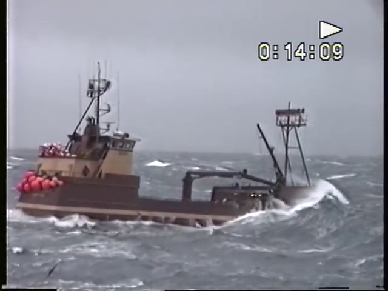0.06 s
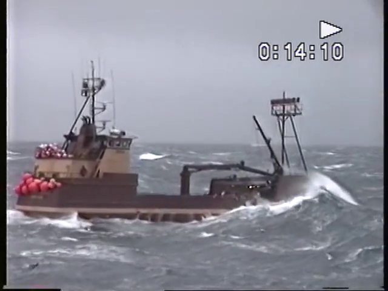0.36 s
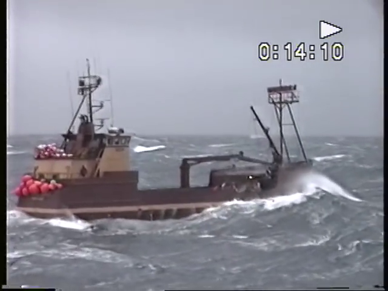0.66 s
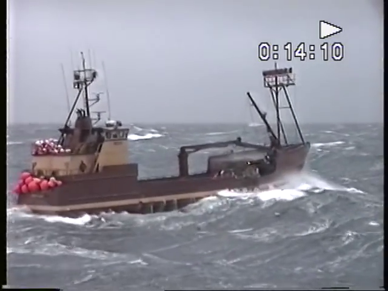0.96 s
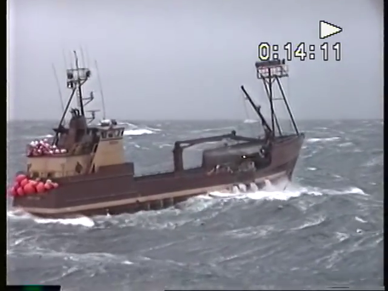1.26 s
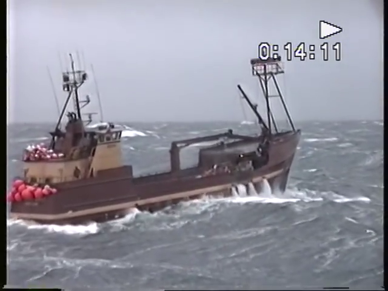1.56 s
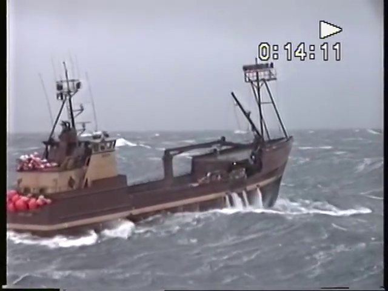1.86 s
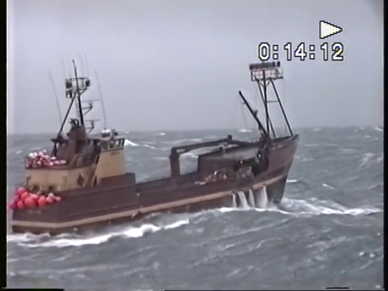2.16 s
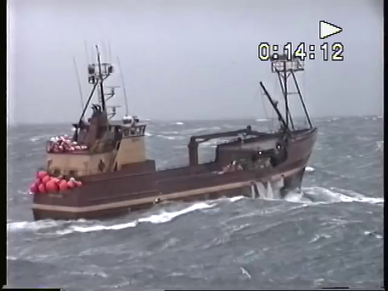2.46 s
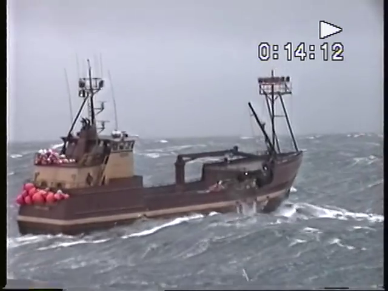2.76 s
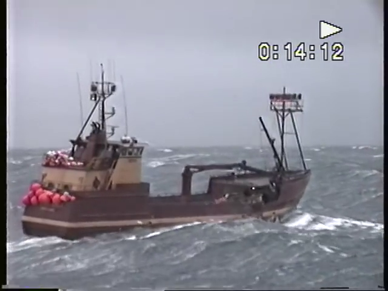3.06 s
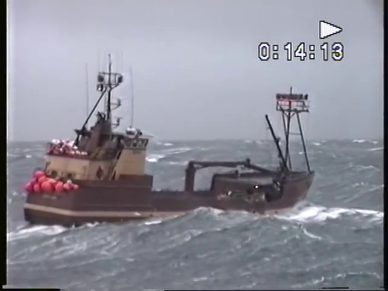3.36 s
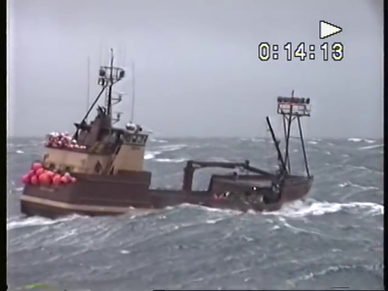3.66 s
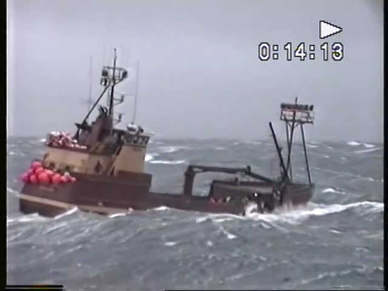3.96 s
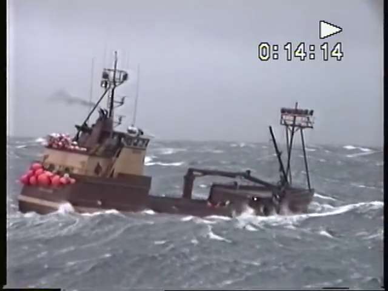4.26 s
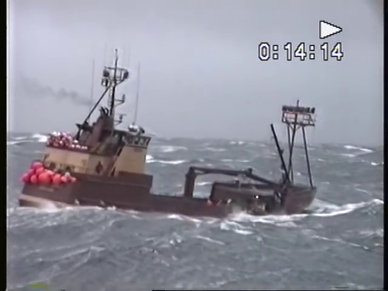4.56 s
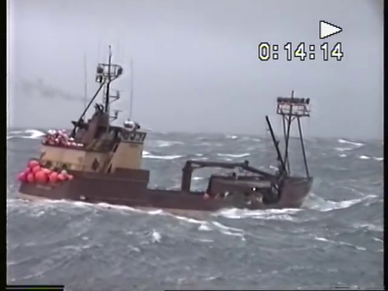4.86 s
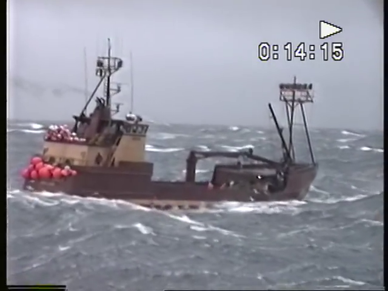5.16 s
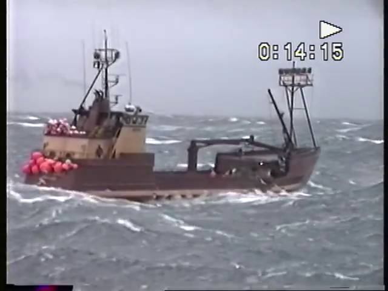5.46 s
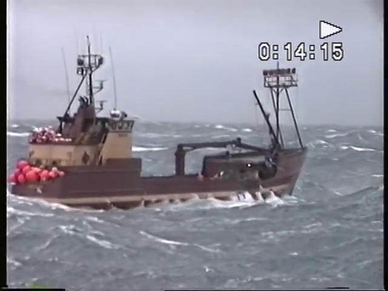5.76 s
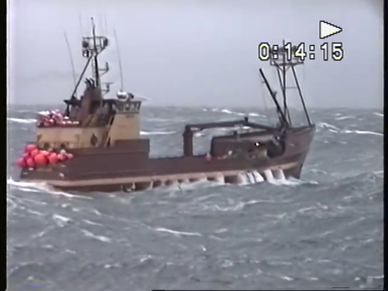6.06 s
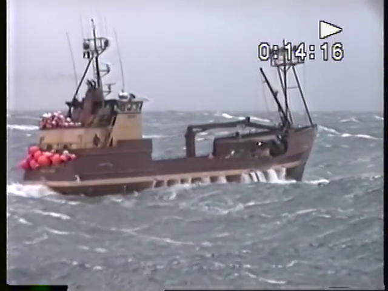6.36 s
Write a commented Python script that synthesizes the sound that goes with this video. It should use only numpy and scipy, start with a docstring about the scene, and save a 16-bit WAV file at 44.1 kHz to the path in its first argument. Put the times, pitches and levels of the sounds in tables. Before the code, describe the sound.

A fishing boat's diesel engines drone with a pulsing beat in rough sea, over wave wash, spray and wind rumbling on the microphone.

```python
"""A fishing boat rides a heavy sea, heard on a tape camcorder. From the start two six-cylinder diesels
beat three or four times a second over a near hull's hum, wind rumble, wave wash and spray; the tape's
noise reduction makes wash and hiss flutter with the drone. Just before 0.9 s the wind moans, the first of
six times. At 0.9 and 1.3 s the level dips with a thump. A soft, very high hiss swells and fades around
2 s, a third dip follows at 2.5 s, the wind picks up near 4 s, and the last dip comes at 5.7 s."""
import sys
import numpy as np
from scipy import signal
from scipy.fft import rfft, irfft, next_fast_len
from scipy.io import wavfile
from scipy.ndimage import uniform_filter1d, map_coordinates

SR = 44100
rng = np.random.default_rng(int(sys.argv[2]) if len(sys.argv) > 2 else 0)


def bounce(signal):
    """Save signal as a 16-bit WAV file at the path given by the first command-line argument."""
    frames = np.transpose(np.atleast_2d(signal))
    limited = np.clip(frames, -1, 1)
    pcm = np.round(limited * 32767).astype(np.int16)
    wavfile.write(sys.argv[1], SR, pcm)


N = 287091
CYLINDERS = 6

# Engine speed. Each row: time in seconds, firing rate of engine one in Hz, of engine two in Hz.
FIRING_RATES = [(0.0, 135.4, 138.65), (0.35, 137.57, 140.23), (0.7, 139.09, 142.09), (1.1, 140.52, 143.75),
                (1.5, 142.06, 145.57), (2.1, 142.04, 146.46), (2.9, 141.14, 145.37), (3.6, 139.86, 143.59),
                (3.9, 139.84, 142.96), (4.2, 139.36, 142.64), (4.5, 139.08, 142.56), (4.8, 138.9, 142.21),
                (5.3, 139.35, 142.23), (5.7, 140.12, 143.71), (6.1, 141.04, 144.91), (6.5, 141.54, 146.19)]
# Exhaust levels as the boat turns. Each row: time in seconds, firing line of engine one in dB,
# of engine two in dB, base of the lower side lines in dB, of the upper side lines in dB.
EXHAUST_LEVELS = [(0.0, -39.9, -44.6, -39.6, -47.7), (0.2, -33.6, -46.5, -37.7, -46.3),
                  (0.4, -39.1, -42.9, -37.8, -44.5), (0.5, -36.3, -46.9, -39.4, -42.4),
                  (0.8, -37.3, -45.0, -37.1, -39.1), (1.1, -36.9, -46.6, -45.9, -45.7),
                  (1.5, -37.9, -43.3, -42.4, -46.2), (1.8, -39.0, -39.8, -40.2, -45.6),
                  (2.3, -38.1, -38.1, -38.5, -42.8), (2.8, -36.8, -40.5, -43.6, -48.4),
                  (3.1, -36.3, -36.9, -38.2, -40.9), (3.6, -37.3, -36.9, -36.7, -36.6),
                  (3.9, -34.4, -41.6, -37.9, -36.8), (4.2, -37.1, -42.7, -41.4, -38.7),
                  (4.5, -33.7, -42.9, -40.3, -39.2), (4.9, -35.1, -43.4, -41.5, -38.1),
                  (5.4, -34.6, -41.9, -37.6, -37.9), (5.8, -33.8, -43.9, -42.7, -42.1),
                  (6.5, -38.3, -42.1, -46.9, -48.1)]
# Exhaust brightness. Each row: time in seconds, base level of overtones and rasp in dB.
BARK_LEVELS = [(0, -35.5), (.5, -38), (.9, -43), (1.5, -40.5), (2.3, -38.5), (3, -35), (3.8, -37),
               (4.5, -37), (5.4, -37.5), (6.5, -39.5)]
# Side lines and overtones. Each row: multiple of shaft speed, dB over base for engine one, for engine two.
SHAFT_ORDERS = [(3, -27, -21), (5, -15, -5), (7, -18, -12), (8, -22, -20), (9, -30, -24), (10, -34, -21),
                (11, -25, -37), (12, -17.3, -21.5), (14, -28.5, -35), (15, -34, -29), (18, -31, -30),
                (23, -28.5, -32)]
# Near hull's hum. Each row: time in seconds, level in dB.
HULL_LEVELS = [(0, -73), (1.6, -56), (3, -72), (4.1, -52), (6.5, -54)]
# Its tones. Each row: frequency in Hz, relative level in dB.
HULL_TONES = [(37.2, 0), (72.5, -9)]
# Wind on the microphone. Each row: time in seconds, rumble level in dB.
WIND_LEVELS = [(0, -43.5), (.5, -43.5), (.85, -43), (1.1, -39.5), (1.45, -47.5), (2.1, -50), (2.9, -49),
               (3.6, -49.5), (3.9, -45), (5.4, -44.5), (6.5, -41.5)]
# Breaking waves. Each row: peak time in seconds, length in seconds, wash in dB, spray in dB.
WAVES = [(0.097, 0.21, -58, -68), (0.235, 0.024, -49, -58), (0.282, 0.069, -50.5, -58.5),
         (0.97, 0.68, -50, -58.5), (1.24, 0.05, -54, -60), (2.275, 0.56, -50, -66.5),
         (2.308, 0.037, -51, -62), (2.41, 0.036, -57, -80), (2.87, 0.18, -60, -66.5),
         (3.02, 0.062, -54.5, -79), (3.148, 0.43, -51, -70), (3.573, 0.46, -50, -61.5),
         (3.775, 0.098, -46.5, -61), (4.428, 0.074, -49, -63), (5.014, 0.8, -54, -64.5),
         (5.78, 0.41, -50.5, -63.5)]
# Wind buffets. Each row: peak time in seconds, length in seconds, level in dB.
WIND_BUFFETS = [(0.092, 0.035, -48), (0.446, 0.033, -35.5), (0.973, 0.033, -32.5), (1.03, 0.091, -34),
                (1.25, 0.026, -34), (1.792, 0.027, -38), (2.5, 0.059, -38.5), (4.044, 0.021, -42),
                (5.06, 0.042, -41), (5.585, 0.041, -37)]
# Wind moans. Each row: peak time in seconds, length in seconds, pitch in Hz, level in dB.
WIND_MOANS = [(0.863, 0.27, 1094, -64), (2.2, .7, 790, -61.5), (3.05, 0.17, 934, -66),
              (3.6, 0.42, 880, -65.5), (4.8, 0.99, 1566, -67.5), (6.3, 0.35, 456, -57.5)]
# Sudden level dips. Each row: start in seconds, depth in dB, level of the leading thump in dB.
LEVEL_DIPS = [(0.905, 10, -43), (1.263, 15, -41), (2.473, 14, -37.5), (5.668, 19.5, -38.5)]
# Noise spectra. Each row: frequency in Hz, relative density in dB.
RASP_SPECTRUM = [(30, -100), (150, -26), (300, -1), (430, -3), (540, 5), (720, -3), (820, -0.5), (920, -3),
                 (1500, -11), (2500, -19), (9000, -100)]
RUMBLE_SPECTRUM = [(8, -30), (18, -1), (45, 0), (75, -2), (100, -4), (150, -9), (220, -16), (400, -40),
                   (2000, -120)]
WASH_SPECTRUM = [(20, -89), (80, -38), (150, 5), (280, 2), (400, -1.5), (550, -5), (700, -7), (950, -7),
                 (1500, -11.5), (2200, -21.5), (4000, -27.5), (12000, -100)]
SPRAY_SPECTRUM = [(200, -57), (600, -26), (1500, 3), (2500, 0), (3500, -0.5), (5000, 0.5), (7500, -4),
                  (10000, -11), (11500, -15.5), (13000, -23.5), (15500, -24)]
BUFFET_SPECTRUM = [(8, -26), (20, 2), (45, -5), (70, -7.5), (110, -13.5), (300, -32), (2000, -120)]
THUMP_SPECTRUM = [(20, -27), (60, -8), (250, -3.5), (450, -21.5), (1500, -40), (5000, -73)]
HIGH_HISS_SPECTRUM = [(3000, -35), (7000, -0.5), (10000, -2.5), (11500, -8), (13000, -17), (15500, -30)]

TIME_S = np.arange(N) / SR


def amp(db):
    """Decibels to gain."""
    return 10 ** (np.asarray(db) / 20)


def unit(x):
    """x at rms 1."""
    return x / np.sqrt(np.mean(x ** 2) + 1e-20)


def curves(rows):
    """One value per sample for each column after the time."""
    times_s, *columns = np.transpose(rows)
    return [np.interp(TIME_S, times_s, column) for column in columns]


def wobble(rate_hz):
    """Smooth random curve, rate_hz knots a second."""
    knots = rng.standard_normal(int(N * rate_hz / SR) + 4)
    coarse_s = TIME_S[::64]
    return np.interp(TIME_S, coarse_s, map_coordinates(knots, [coarse_s * rate_hz]))


def filtered(x, response):
    """x through a gain given as a function of Hz."""
    size = next_fast_len(N + SR // 2)
    return irfft(rfft(x, size) * response(np.fft.rfftfreq(size, 1 / SR)), size)[..., :N]


def coloured(x, spectrum):
    """x shaped by (Hz, dB) points on a log axis, at rms 1."""
    points_hz, db = np.transpose(spectrum)
    return unit(filtered(x, lambda hz: amp(np.interp(np.log(hz + 1), np.log(points_hz + 1), db))))


def rush(spectrum, patchy_db):
    """Coloured noise at rms 1, with random gain patches in time and frequency."""
    bins = signal.stft(rng.standard_normal(N), nperseg=512)[2]
    patches = uniform_filter1d(rng.standard_normal(bins.shape), size=6, axis=0)
    patches = unit(uniform_filter1d(patches, size=14, axis=1))
    noise = signal.istft(bins * amp(patchy_db * patches), nperseg=512)[1][:N]
    return coloured(noise, spectrum)


def hump(peak_s, length_s):
    """Bell curve of power, length_s wide at half height."""
    return np.exp2(-np.minimum((2 * (TIME_S - peak_s) / length_s) ** 2, 100))


def surges(events, bed_db=-np.inf):
    """Gain of (peak s, length s, dB) humps, added in power to an optional bed."""
    power = sum(amp(db) ** 2 * hump(peak_s, length_s) for peak_s, length_s, db in events)
    return np.sqrt(amp(bed_db) ** 2 + power)


def exhaust(turns, firing_db, lower_db, upper_db, bark_db, orders, orders_db):
    """Firing line and overtones, flanked by lines from cylinders that fire unequally."""
    def line(order, db):
        lag = rng.random() if order > CYLINDERS + 2 else 0  # the pipe scatters overtone phases
        return amp(db) * np.sqrt(2) * np.cos(2 * np.pi * (order * turns - lag))

    sides = np.zeros(N)
    for order, db in zip(orders, orders_db):
        base_db = lower_db if order < CYLINDERS else upper_db if order <= CYLINDERS + 2 else bark_db
        waver_db = 3.0 * min(abs(order / CYLINDERS - 1), 1) * wobble(7)
        sides += line(order, base_db + db + waver_db)
    return line(CYLINDERS, firing_db + 1.03 * wobble(18)) + sides  # combustion varies turn to turn


def rasp(turns, jitter_s, gas_ratio):
    """One puff per firing, each cylinder with its own size and timing; hot gas hisses after it."""
    fired = np.flatnonzero(np.diff(np.floor(turns * CYLINDERS)))
    cylinder = np.arange(len(fired)) % CYLINDERS
    size, lateness = rng.standard_normal((2, CYLINDERS))
    onsets = np.clip(fired + (jitter_s * SR * lateness[cylinder]).astype(int), 0, N - 1)
    puff_db = 6.0 * size[cylinder] + 3.0 * rng.standard_normal(len(onsets))
    puffs = np.bincount(onsets, amp(puff_db), N)
    gas = rng.standard_normal(N) * np.exp(-3 * (turns * CYLINDERS % 1))
    return coloured(unit(puffs) + gas_ratio * unit(gas), RASP_SPECTRUM)


def diesels():
    """Two engines speed up and sag as the swell loads the propellers, drifting in and out of step."""
    one_hz, two_hz = curves(FIRING_RATES)
    one_db, two_db, lower_db, upper_db = curves(EXHAUST_LEVELS)
    bark_db, = curves(BARK_LEVELS)
    orders, one_orders_db, two_orders_db = np.transpose(SHAFT_ORDERS)
    one_turns = np.cumsum(one_hz) / SR / CYLINDERS + 0.655
    two_turns = np.cumsum(two_hz) / SR / CYLINDERS + 0.107
    drone = exhaust(one_turns, one_db, lower_db, upper_db, bark_db, orders, one_orders_db)
    drone += exhaust(two_turns, two_db, lower_db, upper_db, bark_db, orders, two_orders_db)
    puffs = rasp(one_turns, jitter_s=0.000561, gas_ratio=1.7)
    puffs += rasp(two_turns, jitter_s=0.000474, gas_ratio=0.97)
    return drone + amp(bark_db - 23.5) * puffs


def hull_hum():
    """The near hull hums at its own rate, wavering a little."""
    hum_db, = curves(HULL_LEVELS)
    wavering_s = TIME_S + 0.002 * wobble(3.4)
    return sum(amp(hum_db + db + 1.5 * wobble(5.5)) * np.sqrt(2) * np.sin(2 * np.pi * hz * wavering_s)
               for hz, db in HULL_TONES)


def wind_rumble():
    """Gusty wind on the microphone."""
    rumble_db, = curves(WIND_LEVELS)
    return amp(rumble_db + 0.91 * wobble(14)) * rush(RUMBLE_SPECTRUM, patchy_db=-0.3)


def waves(wash_bed_db, spray_bed_db, fade_db_per_s):
    """Crests break and throw flickering spray over an open sea whose hiss slowly thins."""
    peak_s, length_s, wash_db, spray_db = np.transpose(WAVES)
    wash_gain = surges(zip(peak_s, length_s, wash_db), wash_bed_db)
    spray_gain = surges(zip(peak_s, length_s, spray_db), spray_bed_db - fade_db_per_s * TIME_S)
    wash = wash_gain * rush(WASH_SPECTRUM, patchy_db=0.6)
    spray = spray_gain * rush(SPRAY_SPECTRUM, patchy_db=0.5)
    return wash + spray * amp(0.68 * wobble(19))


def noise_reduction(x, depth, follow_s, settle_s, bass_share):
    """The tape's compander mistracks: gain follows the fast envelope over the slow, deepening throbs."""
    fast = uniform_filter1d(abs(signal.hilbert(x[0])), size=int(follow_s * SR)) + 1e-6
    pole = np.exp(-1 / (settle_s * SR))
    slow = signal.lfilter([1 - pole], [1, -pole], fast, zi=[pole * fast.mean()])[0]
    gain = (fast / slow) ** depth
    treble = filtered(x, lambda hz: hz ** 2 / (hz ** 2 + 400 ** 2))
    return x + (treble + bass_share * (x - treble)) * (gain - 1)


def line_whistle(line_hz, field_hz):
    """A faint high whistle, pulsing at field rate with a slight random flutter, louder on the left."""
    flutter = 1 + 0.4 * np.cos(2 * np.pi * field_hz * TIME_S) + 0.25 * wobble(24)
    return amp([[-82.5], [-89.5]]) * flutter * np.sin(2 * np.pi * line_hz * TIME_S)


def buffets():
    """Single gusts hit the microphone."""
    return surges(WIND_BUFFETS) * coloured(rng.standard_normal(N), BUFFET_SPECTRUM)


def moans(width_hz):
    """Wind moans: narrow noise bands swell and fade with the gusts."""
    sound = np.zeros(N)
    for peak_s, length_s, pitch_hz, db in WIND_MOANS:
        band = filtered(rng.standard_normal(N), lambda hz: 1 / (1 + (2 * (hz - pitch_hz) / width_hz) ** 2))
        sound += amp(db) * np.sqrt(hump(peak_s, length_s)) * unit(band)
    return sound


def thumps(lead_s, length_s):
    """A low thump leads each dip."""
    gain = surges((start_s - lead_s, length_s, db) for start_s, _, db in LEVEL_DIPS)
    return gain * coloured(rng.standard_normal(N), THUMP_SPECTRUM)


def dips(x, fall_s, quick_s, slow_s, quick_share, treble_depth_ratio):
    """The level drops, the treble slightly further; part returns quickly, the rest slowly."""
    gain_db = np.zeros(N)
    for start_s, depth_db, _ in LEVEL_DIPS:
        fall = np.clip((TIME_S - start_s) / fall_s, 0, 1)
        after_s = np.maximum(TIME_S - start_s - fall_s, 0)
        left = quick_share * np.exp(-after_s / quick_s) + (1 - quick_share) * np.exp(-after_s / slow_s)
        gain_db -= depth_db * fall * left
    treble = filtered(x, lambda hz: hz ** 2 / (hz ** 2 + 2500 ** 2))
    return (x - treble) * amp(gain_db) + treble * amp(gain_db * treble_depth_ratio)


def high_hiss(peak_s, length_s, db):
    """A soft, very high hiss swells and fades."""
    hiss = coloured(rng.standard_normal(N), HIGH_HISS_SPECTRUM)
    return amp(db) * np.sqrt(hump(peak_s, length_s)) * hiss


def scene():
    """All sources at one microphone, copied to two channels."""
    sound = diesels() + hull_hum() + wind_rumble() + buffets()
    sound += thumps(lead_s=0.0013, length_s=0.03) + moans(width_hz=82)
    sea = waves(wash_bed_db=-51, spray_bed_db=-62, fade_db_per_s=0.62)
    hiss = high_hiss(peak_s=2, length_s=0.98, db=-71.5)
    gust_db = 0.5 * wobble(21.11)
    return np.tile(sound + amp(gust_db) * (sea + hiss), (2, 1))


def record(dry):
    """Noise reduction, dips, a louder and brighter left side, tape hiss, whistle, band limit."""
    sound = noise_reduction(dry, depth=0.5, follow_s=0.009, settle_s=0.05, bass_share=0.58)
    sound = dips(sound, fall_s=0.0048, quick_s=0.017, slow_s=0.18, quick_share=0.31,
                 treble_depth_ratio=1.02)
    lean_db = lambda hz: np.interp(hz, [2000, 12000], [1.5, 2.6])
    sound = filtered(sound, lambda hz: amp([lean_db(hz), -lean_db(hz)]))
    hiss = amp(-93) * rng.standard_normal((2, N))
    whistle = line_whistle(line_hz=15734, field_hz=59.94)
    return filtered(sound + hiss + whistle, lambda hz: hz < 15800)


dry = scene()
out = record(dry)
bounce(out)
```